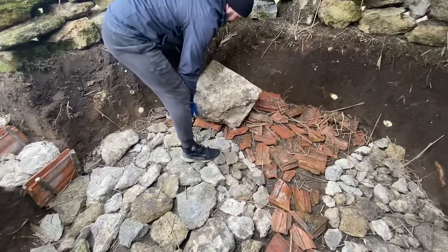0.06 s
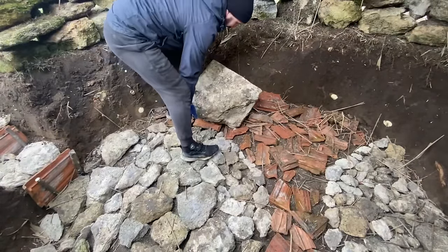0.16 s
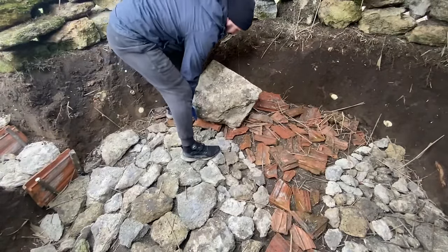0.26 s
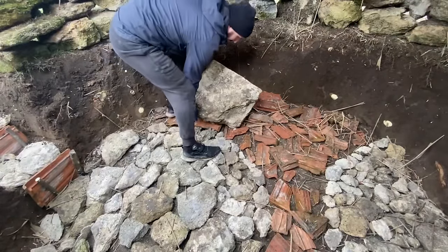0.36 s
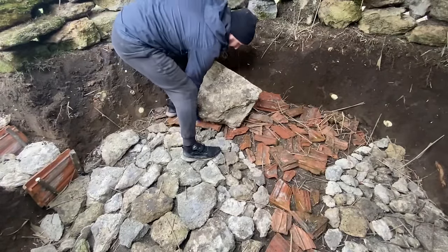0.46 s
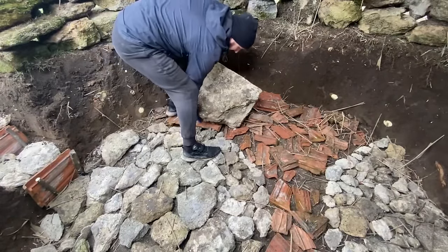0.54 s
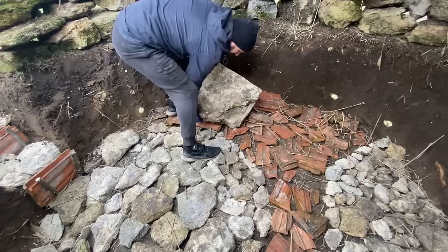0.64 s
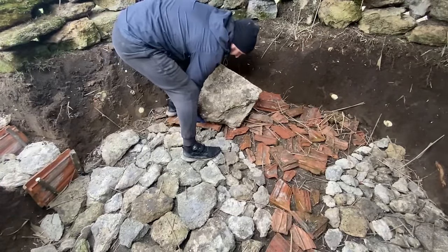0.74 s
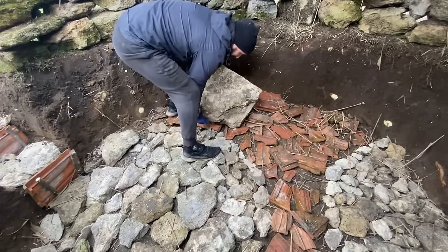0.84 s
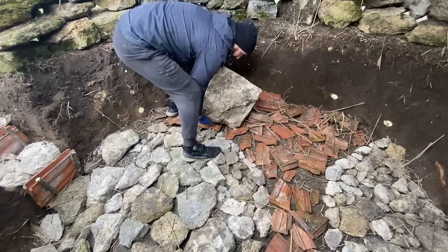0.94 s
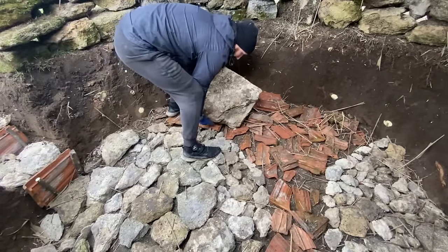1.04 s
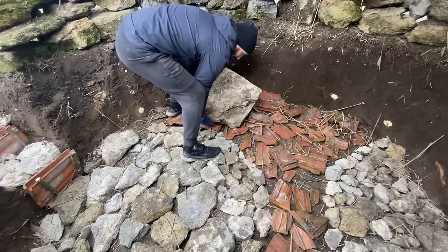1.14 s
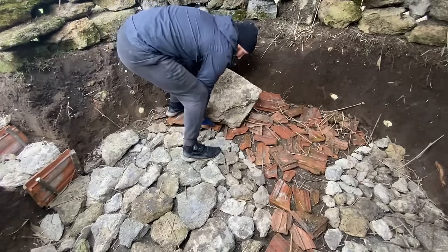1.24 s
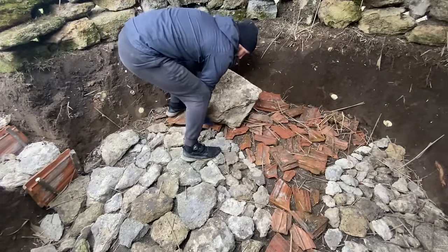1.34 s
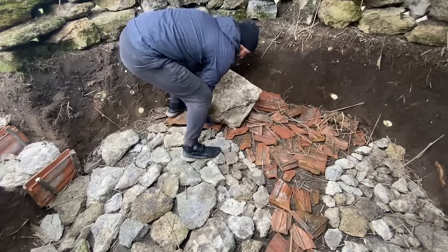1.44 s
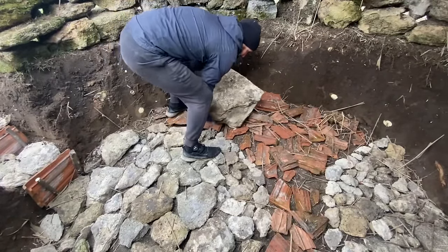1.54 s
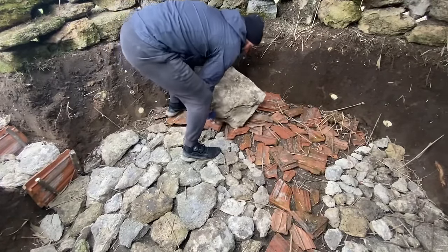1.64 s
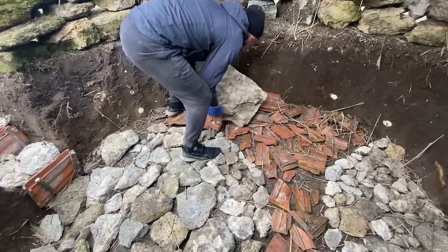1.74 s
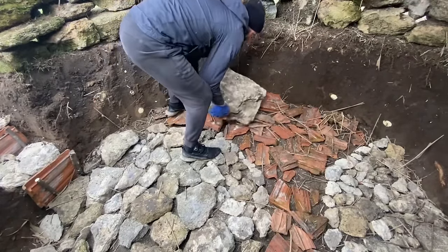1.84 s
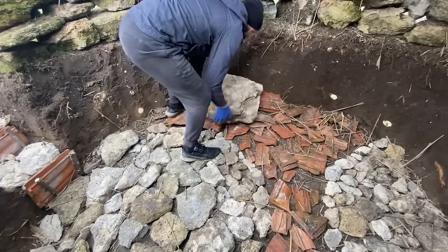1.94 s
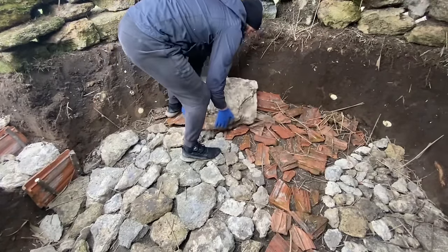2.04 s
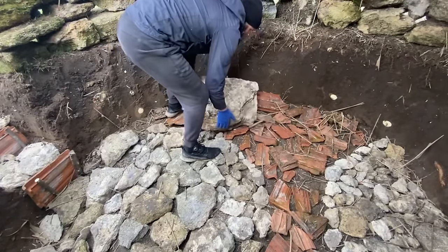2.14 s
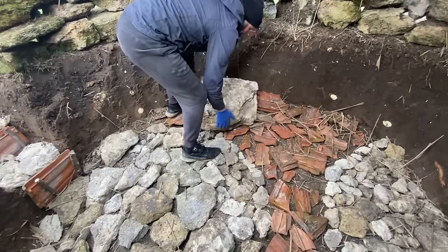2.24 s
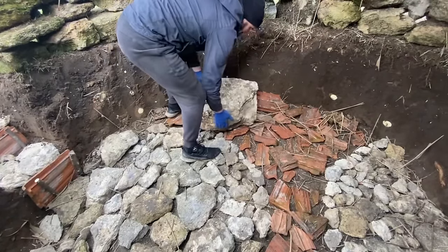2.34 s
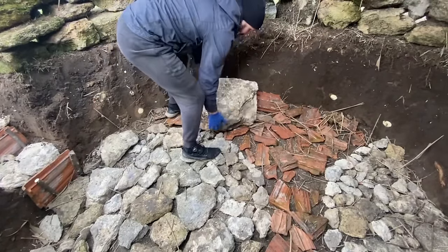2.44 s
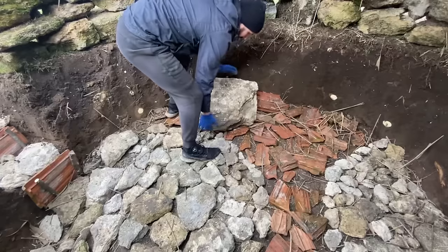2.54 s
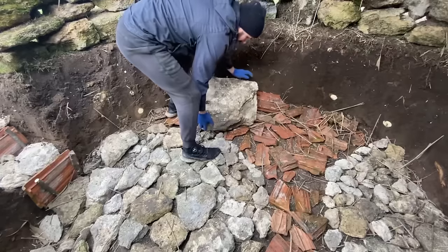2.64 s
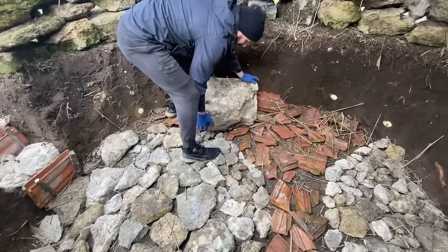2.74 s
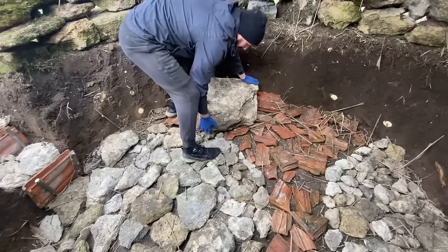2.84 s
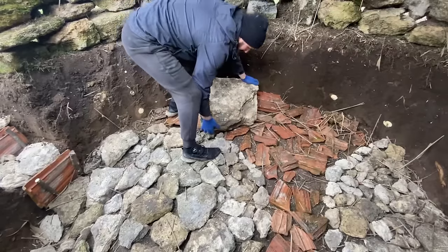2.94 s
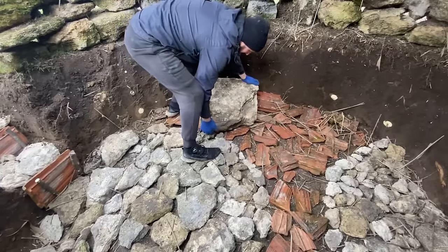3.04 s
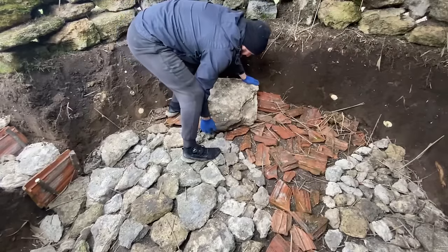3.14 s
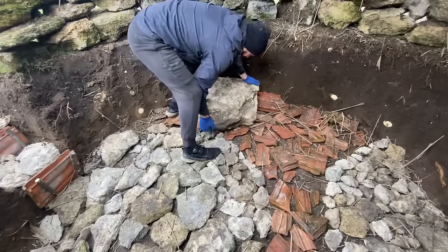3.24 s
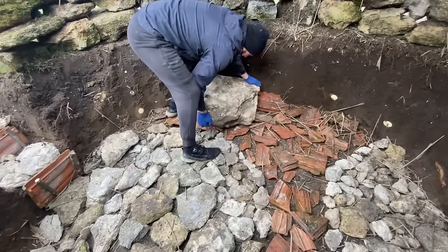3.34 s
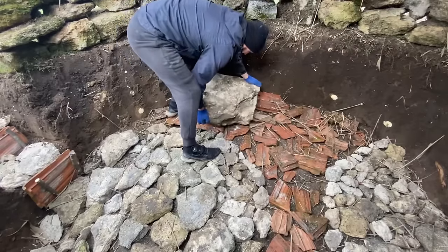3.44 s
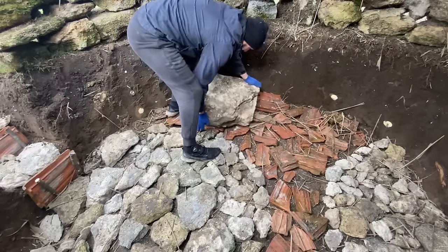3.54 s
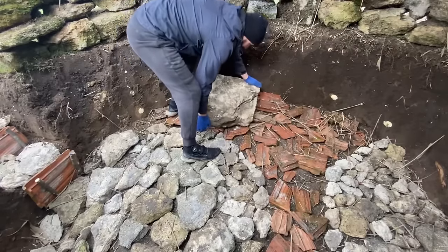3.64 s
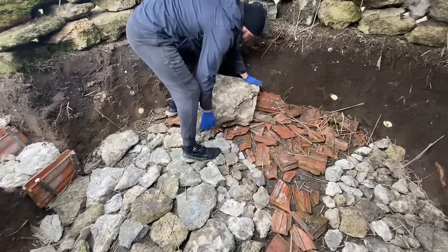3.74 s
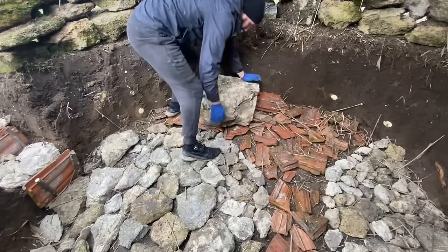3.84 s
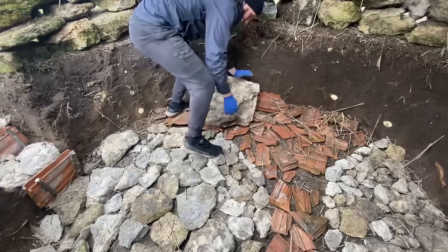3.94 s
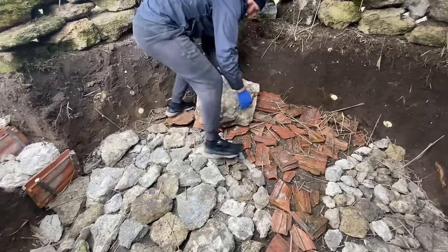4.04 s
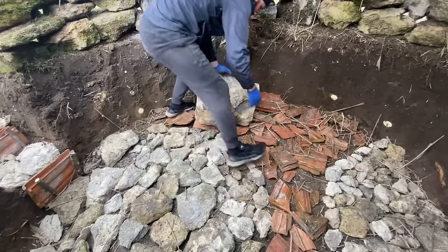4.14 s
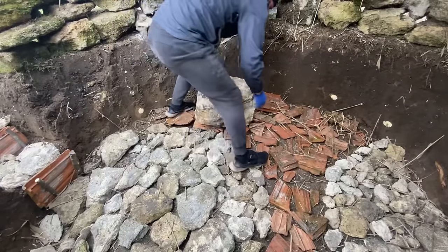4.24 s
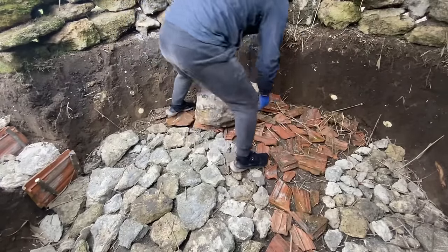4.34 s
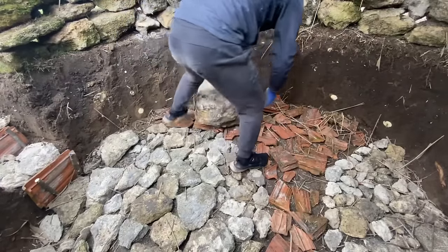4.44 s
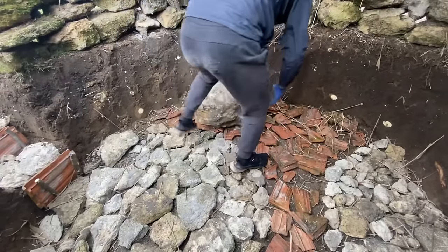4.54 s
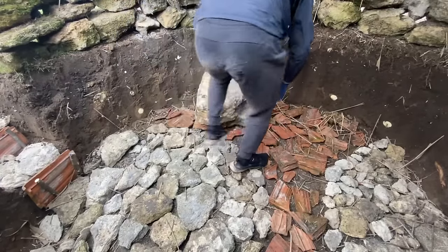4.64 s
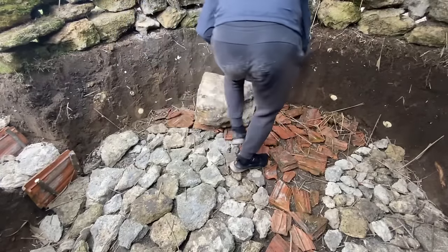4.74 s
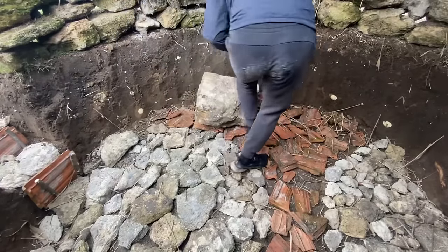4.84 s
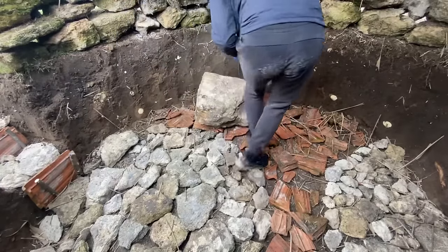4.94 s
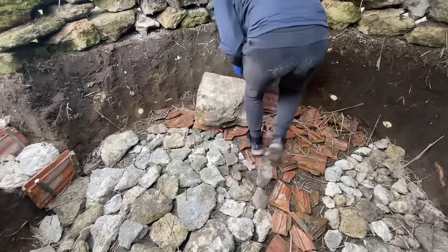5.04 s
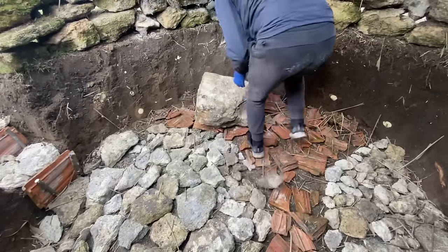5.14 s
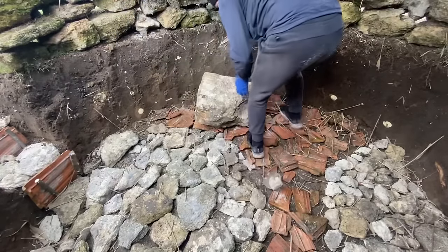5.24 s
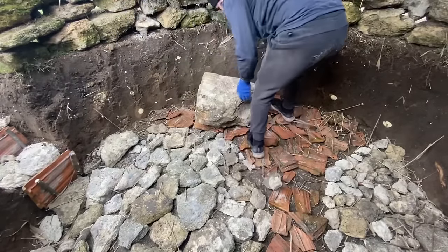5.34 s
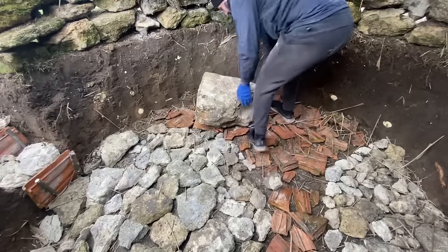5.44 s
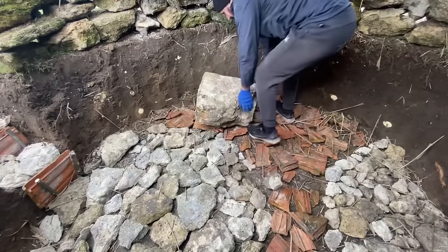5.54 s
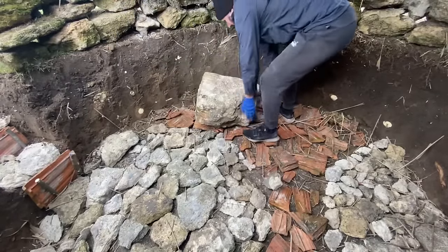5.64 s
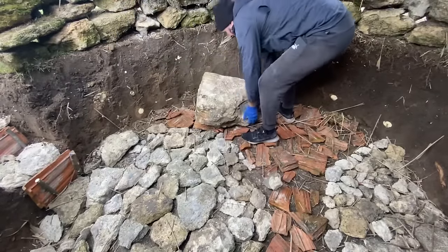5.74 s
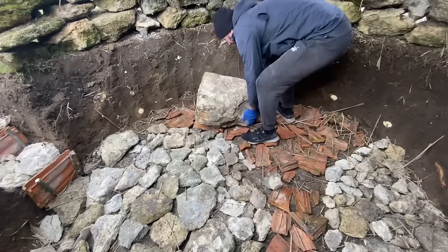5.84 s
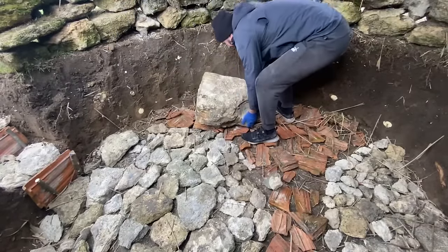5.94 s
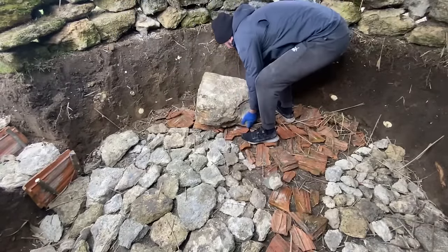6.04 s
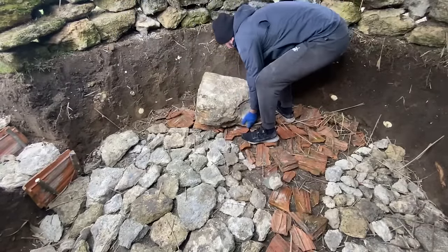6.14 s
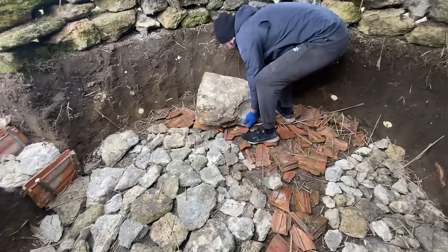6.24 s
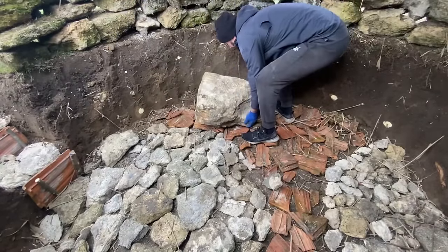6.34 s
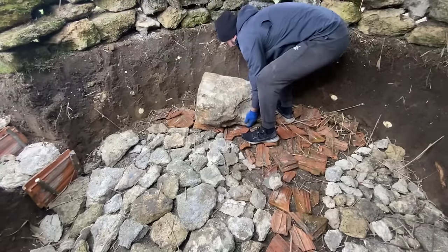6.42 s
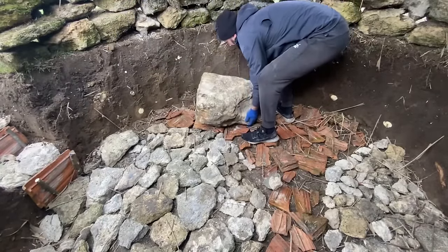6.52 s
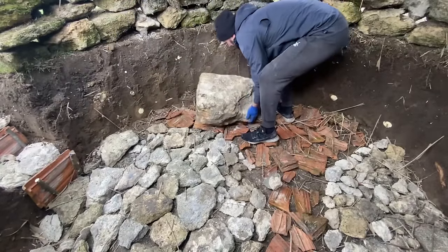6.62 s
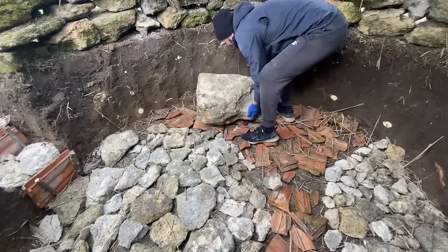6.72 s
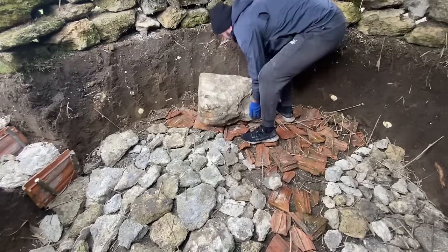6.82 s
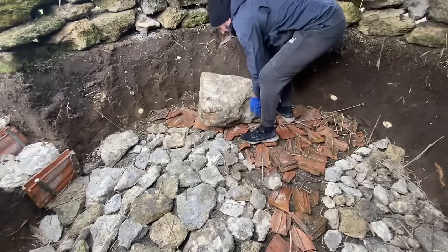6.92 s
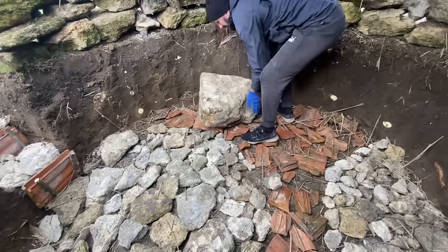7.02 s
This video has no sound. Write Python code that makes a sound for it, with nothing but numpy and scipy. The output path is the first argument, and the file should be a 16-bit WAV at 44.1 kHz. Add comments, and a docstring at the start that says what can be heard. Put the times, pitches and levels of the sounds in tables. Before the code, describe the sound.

In an earth pit outdoors, a boulder is nudged almost silently, then drags jerkily over broken clay tiles and drops with a loud, dry clunk and soil thud. Softer knocks follow as it is rocked. Shoes crunch on grit, a loose stone clinks twice, and a final double knock settles the boulder. A phone a few metres away catches faint steady rumble.

```python
"""In an earth pit outdoors, a boulder is dragged, dropped and rocked into place on broken clay tiles.
Knocks are bursts of tiny contacts that ring hollows, slabs and shards; drops also thud in the soil.
Sliding is jerky stick-slip that rings the tiles; grit is a crowd of short noise bursts under boulder and shoes.
A loose stone, kicked away, clinks twice as fading sine waves. A phone a few metres off also hears
a faint steady rumble of filtered noise."""
import sys
import numpy as np
from scipy import signal
from scipy.fft import rfft, irfft
from scipy.io import wavfile

SR = 44100
rng = np.random.default_rng(int(sys.argv[2]) if len(sys.argv) > 2 else 0)


def log_audio(samples):
    """Write samples as a 16-bit WAV file to the path given in sys.argv[1]."""
    # one column per channel
    frames = np.atleast_2d(samples).T
    # limit to full scale, then quantise
    limited = np.clip(frames, -1, 1)
    pcm = np.round(limited * 32767).astype(np.int16)
    wavfile.write(sys.argv[1], SR, pcm)


N = 312228
TIME = np.arange(N) / SR  # clock of the whole scene, s
RING = np.arange(int(.2 * SR)) / SR  # clock of one short sound, s

# Blows on the tile bed: t/s, slab level/dB, weight (hollows relative to slabs)/dB,
# hardness (shards relative to slabs)/dB, rattle time/s
KNOCKS = [(0.269, -60.5, 19, -2, 0.012), (1.486, -38.5, 5.5, -5.5, 0.015),
          (1.525, -32.5, -13, -10.5, 0.022), (1.596, -40, -8, -7, 0.0024), (1.619, -47, 8.5, 11.5, 0.017),
          (1.652, -28, -3.5, -16, 0.022), (1.771, -30.5, -4.5, -2, 0.0086), (1.826, -27.5, -14, -3, 0.003),
          (1.874, -20.5, -7.5, -8.5, 0.0058), (2.016, -21.5, -27, 3, 0.0081),
          (2.0205, -15.5, -21, -11, 0.0034), (2.026, -9.5, -5, -3.5, 0.003), (2.072, -40, -7, 1, 0.0027),
          (2.115, -32.5, -5.5, -2, 0.0097), (2.042, -27.5, -7.5, -3, 0.0085),
          (2.235, -41.5, -5.5, -3, 0.056), (3.286, -40.5, -6, -11, 0.0079), (3.402, -37, -5.5, -11, 0.01),
          (3.443, -32.5, -3.5, -4.5, 0.026), (3.511, -24.5, -2, -2, 0.011),
          (3.519, -21.5, -6, -7.5, 0.0028), (4.185, -43, -9, -4.5, 0.0043), (4.22, -41, 0.5, 6, 0.046),
          (4.2559, -32.5, 2.5, 2, 0.0024), (4.4, -28, -1, 0, 0.0044), (4.455, -38, -12, -0.5, 0.011),
          (4.906, -44, -1.5, -1.5, 0.0091), (5.009, -42.5, -1, 6, 0.017), (5.393, -33.5, -7.5, -16, 0.0019),
          (5.407, -35.5, -2, 5, 0.0036), (5.427, -42, -7, 3, 0.0019), (5.509, -47, 6, -4, 0.0064),
          (5.666, -39.5, 4, -6, 0.017), (5.747, -39.5, 1.5, -9.5, 0.003), (6.775, -27.5, 7.5, -5.5, 0.0077),
          (6.79, -19, -5, -7.5, 0.002), (6.894, -35, -15.5, -2, 0.0035), (6.946, -36, -6.5, -3, 0.023)]
# Weight landing on the soil: t/s, level/dB
THUDS = [(2.025, -21.5), (3.519, -37), (5.406, -35.5), (6.922, -37.5)]
# Ringing modes of the soil, the hollows under the tiles, the slabs and the shards:
# f/Hz, level/dB, time to fade by 60 dB/s
SOIL_MODES = [(56.7, -4, 0.13), (86.5, 1, 0.088), (137, -6, 0.11)]
HOLLOW_MODES = [(215, -14, .035), (262, -4, .045), (286, 0, .055)]
SLAB_MODES = [(440, 0, .045), (512, 2, .052), (590, -3, .035), (675, -2, .04), (748, -1, .04),
              (860, -6, .03), (1000, -5, .035)]
SHARD_MODES = [(1145, 3.5, 0.027), (1323, 4.5, 0.016), (1574, 1.5, 0.035), (1760, -11.5, 0.055),
               (2236, 0, 0.023), (2393, -12, 0.13), (3017, -6, 0.035), (3276, -9, 0.067), (4880, -14, .05)]
# Spectrum of cracking tile, also used for scuffs: f/Hz, level per Hz/dB
CRACK_COLOUR = [(200, -25), (1000, 11.5), (3000, -1), (4200, 4), (8000, -4), (11500, -4), (13300, -23.5)]


def knocks():
    """Each blow is a first contact and a dying rattle of smaller ones, which ring hollows, slabs and shards."""
    rattle_per_s, rattle_spread_db, first_contact = 900, 5.1, 3.7
    crack_stretch, swell = 0.96, 0.081  # crushing fade and build-up, as shares of the rattle time
    crush_force_db = -14
    # hardness rings the shards and raises the cracking level faster still
    crack_db_at_zero, crack_per_hardness = -9, 2.08
    shard_tilt_db, tilt_per_hardness = -2.0, 0.5  # tilt in dB per octave
    out = np.zeros((2, N))
    two_shards = np.tile(SHARD_MODES, (2, 1))  # each blow lands on two shards
    for s, slab_db, weight_db, hardness_db, rattle_s in KNOCKS:
        hollow_db = slab_db + weight_db
        shard_db = slab_db + hardness_db
        crack_db = slab_db + crack_db_at_zero + crack_per_hardness * hardness_db

        build_up = 1 - np.exp(-RING / (swell * rattle_s))
        crush = hiss(len(RING)) * build_up * np.exp(-RING / (crack_stretch * rattle_s))
        rattle = clicks(rattle_per_s, rattle_spread_db, len(RING)) * build_up
        rattle = rattle * np.exp(-(RING / rattle_s) ** 2.3)
        # the bed is crushed as well as struck, which roughens every ring
        force = rattle + undb(crush_force_db) * crush[1]
        force[0] += first_contact

        # a lightly loaded bed is slacker, so its hollows sound lower
        slack = .84 if max(slab_db, hollow_db) < -25 else 1
        # a hard contact brings out the high modes of the shards
        tilt_db = shard_tilt_db + tilt_per_hardness * hardness_db
        hollow = ring(HOLLOW_MODES, pitch=slack, detune=0.025, rise_cycles=2.2)
        slab = ring(SLAB_MODES, detune=0.038, tilt_db=3.0, right_db=-1.3)
        shard = ring(two_shards, detune=0.05, tilt_db=tilt_db, right_db=1.5)
        add(out, s, through(force, hollow), hollow_db)
        add(out, s, through(force, slab), slab_db)
        add(out, s, through(force, shard), shard_db)
        add(out, s, colour(crush, CRACK_COLOUR), crack_db)
    for s, db in THUDS:
        add(out, s, ring(SOIL_MODES), db)
    return out


# The loose stone bouncing: t/s, level/dB, upper modes level/dB, ring length as a share of the full one
CLINKS = [(5.0402, -16.5, -27, 0.34), (5.0448, -21.5, -36, 0.58), (5.1878, -14.5, -21.5, 1),
          (5.217, -49, -31, 0.49)]
# Single shards ringing freely, and the loose stone's first light touch at 5.18 s: t/s, f/Hz, level/dB, time to
# fade by 60 dB/s
PINGS = [(1.637, 2483, -31.5, 0.034), (1.662, 627, -32.5, 0.055), (1.775, 968, -29, 0.11),
         (1.829, 1019, -30.5, 0.21), (2.017, 2587, -19, 0.043), (2.027, 489, -17.5, 0.037),
         (2.225, 498, -40, 0.028), (3.514, 742, -23, 0.048), (3.515, 1053, -31.5, 0.034),
         (3.602, 1268, -49, 0.092), (3.859, 2600, -49.5, .035), (4.246, 2530, -46, 0.031),
         (4.257, 3705, -33, 0.022), (4.383, 813, -34, 0.14), (5.182, 2440, -25.5, 0.0059),
         (5.183, 5300, -28, 0.019), (5.369, 1232, -36, 0.055), (5.406, 2806, -27.5, 0.024),
         (5.409, 1730, -29, 0.061), (5.427, 3240, -35.5, 0.04), (5.511, 1275, -48, 0.09),
         (6.062, 1730, -46, 0.089), (6.065, 2417, -49, 0.14), (6.185, 2400, -58, 0.091),
         (6.27, 2416, -57, .1), (6.79, 1790, -28, 0.02), (6.791, 428, -23.5, 0.047),
         (6.897, 1295, -34, 0.077)]
# Main and upper ringing modes of the loose stone: f/Hz, level/dB, time to fade by 60 dB/s
STONE_MODES = [(1030, -8, .028), (1150, -7, .042), (1328, 0, .066), (1365, -14, .035)]
STONE_UPPER_MODES = [(1700, 7, 0.02), (2100, -7, 0.041), (2670, -4, 0.017), (2944, 4.5, 0.068),
                     (3137, -1.5, 0.053), (3490, -5, 0.03), (4700, -15, 0.032), (5500, -16.5, 0.027)]


def clinks():
    """The loose stone keeps its pitch; rough corners scuff and chatter its upper modes; single shards ping."""
    chatter_s, scuff_s = 0.0049, 0.0087
    stone_chatter, ping_chatter = 0.41, .06
    scuff_db = -10  # relative to the upper modes or the ping
    out = np.zeros((2, N))

    def contact(roughness):
        """A touch and the brief chatter after it."""
        chatter = rng.standard_normal(len(RING)) * np.exp(-RING / chatter_s)
        return (RING == 0) + roughness * chatter

    def scuff():
        """Rough faces brushing past each other make a short burst of noise."""
        return colour(hiss(len(RING)) * np.exp(-RING / scuff_s), CRACK_COLOUR)

    for s, db, upper_db, length in CLINKS:
        # lying against other stones shortens the ring
        damped_modes = np.array(STONE_MODES) * [1, 1, length]
        upper = ring(STONE_UPPER_MODES, right_db=3.5)
        add(out, s, ring(damped_modes, right_db=13.0, rise_cycles=4.6), db)
        add(out, s, through(contact(stone_chatter), upper), upper_db)
        add(out, s, scuff(), upper_db + scuff_db)
    for s, hz, db, t60 in PINGS:
        shard = ring([(hz, 0, t60)], right_db=1.5, rise_cycles=4.4)
        add(out, s, through(contact(ping_chatter), shard), db)
        add(out, s, scuff(), db + scuff_db)
    return out


# The boulder is shoved along: t/s, length/s, speed level/dB
SHOVES = [(0.35, 0.024, -51.5), (0.418, 0.015, -52), (1.434, 0.036, -48.5), (1.465, 0.099, -43.5),
          (1.615, 0.27, -30.5), (1.996, 0.02, -30.5), (3.298, 0.3, -49.5), (6.493, 0.084, -43.5),
          (6.623, 0.057, -40.5), (6.883, 0.032, -35.5)]


def boulder_speed():
    """Each shove gets the boulder going, keeps it sliding and lets it stop."""
    attack_s, release_s = 0.027, 0.052
    shoves = [undb(db) * push(s, length, attack_s, release_s) for s, length, db in SHOVES]
    return np.max(shoves, axis=0)


# Modes of the tiles that the boulder scrapes over: f/Hz, level/dB, time to fade by 60 dB/s
DRAG_MODES = [(257, -12, 0.061), (800, -1.5, 0.013), (1053, -1.5, 0.023), (1262, -6, 0.03),
              (1571, -0.5, 0.017), (1790, -7.5, 0.02), (2326, -8, 0.022), (2560, -6.5, 0.018)]
# The gap under the boulder changes note as it slides onto other tiles: from t/s, f/Hz, level/dB
GAPS = [(0, 540, -7.5), (1.4, 716, 0), (1.63, 622, 5.5), (1.76, 696, 1.5), (2.4, 651, 0), (4.5, 725, 2)]


def grinding(sliding):
    """The stone sticks and slips in jerks, which ring the tiles and the gap beneath it."""
    slips_per_s, slip_spread_db, jerk_db = 450, 2.8, 3
    catch_s, catch_db, gap_t60 = .025, -9, 0.035
    # the stone catches on an edge for a moment before each knock
    caught = np.max([(TIME > s - catch_s) & (TIME < s) for s, *_ in KNOCKS], axis=0)
    speed = sliding * undb(catch_db * caught + jerk_db * walk(60))
    slips = unit(clicks(slips_per_s, slip_spread_db, N)) * speed
    place = np.searchsorted([s for s, *_ in GAPS[1:]], TIME)  # which gap is under the boulder
    out = 0
    for k, (s, hz, db) in enumerate(GAPS):
        body = ring([(hz, db, gap_t60)] + DRAG_MODES, detune=0.029, right_db=3.0)
        body = body / np.sqrt(np.sum(body ** 2) / 2)
        out = out + through(slips * (place == k), body)
    return out


# A shoe or the boulder's edge bears down on grit and eases off: peak t/s, level/dB, build-up/s, release/s
CRUNCHES = [(.52, -60, 0.34, 0.75), (1.628, -29, 0.0089, 0.056), (2.58, -51.5, 0.12, 0.11),
            (3.27, -45, 0.16, 0.16), (4.235, -51.5, 0.05, 0.054), (4.392, -42, 0.057, 0.045),
            (4.955, -44, 0.085, 0.13), (5.127, -43, 0.027, 0.11), (5.347, -37.5, 0.0052, 0.11),
            (5.404, -25, 0.02, 0.018), (5.55, -55, 0.068, 0.37), (6.035, -44.5, 0.026, 0.033),
            (6.65, -52.5, 0.23, 0.043), (6.9, -42.5, 0.1, 0.042)]


def pressure():
    """The load on the grit builds and eases with each crunch."""
    crunches = [undb(db) * push(s, 0, build_s, release_s) for s, db, build_s, release_s in CRUNCHES]
    return np.max(crunches, axis=0)


# Single grains of grit snapping: t/s, level/dB
SNAPS = [(0.1217, -58.5), (0.443, -42), (1.729, -30.5), (2.0258, -23.5), (2.661, -50), (4.14, -54.5),
         (4.829, -52), (4.97, -42.5), (5.108, -42.5), (5.339, -42.5), (5.395, -26), (5.955, -51.5)]
# Spectra of the crushed grit and of a snapping grain: f/Hz, level per Hz/dB
GRIT_COLOUR = [(200, -28), (1000, -1), (2500, -3.5), (5300, -4), (7000, -4.5), (9000, -9.5), (11000, -2),
               (12300, -6), (13500, -21.5)]
SNAP_COLOUR = [(500, -9), (8500, -8.5), (11500, -1.5), (14000, -20.5)]


def grit(crushing):
    """Dense tiny fractures are each a short burst of noise; now and then a single grain snaps."""
    grains_per_s, spread_db, flicker_db = 1800, 4, 0.5
    grain_s, snap_s = .0018, .003
    force = unit(clicks(grains_per_s, spread_db, N)) * undb(flicker_db * walk(70))
    # overlapping bursts add up in energy
    energy = through(force ** 2, np.exp(-2 * RING / grain_s)[None])
    burst = np.maximum(energy, 0) ** .5
    out = unit(colour(burst * hiss(N), GRIT_COLOUR)) * crushing
    for s, db in SNAPS:
        snap = hiss(len(RING)) * np.exp(-RING / snap_s)
        add(out, s, colour(snap, SNAP_COLOUR), db)
    return out


def pit(x):
    """Earth walls and stones soon scatter the sound; the garden beyond returns a faint tail, mostly treble."""
    near_db, near_t60, near_from_s = -11, 0.083, .004
    far_db, far_t60, far_from_s = -32, 0.22, .03
    fade = undb(-60 * RING / np.array([near_t60, far_t60])[:, None, None])
    near, far = rng.standard_normal((2, 2, len(RING))) * fade
    near = near * (RING > near_from_s)
    far = colour(far * (RING > far_from_s), [(1500, -24.0), (12000, -2.5)])
    response = undb(near_db) * unit(near) + undb(far_db) * unit(far)
    return x + through(x, response / np.sqrt(len(RING)))


# Spectrum of the outdoor background: f/Hz, level per Hz/dB
OUTDOORS_COLOUR = [(20, -16.5), (55, -1.5), (140, 0), (260, -7.5), (500, -16), (1000, -25), (6000, -36),
                   (11500, -31), (14000, -48)]


def outdoors():
    """Steady distant rumble, much alike on both sides, under a thin diffuse hiss: all filtered noise."""
    level_db = -51
    mid, side = rng.standard_normal((2, N))
    # left and right differ most in the treble
    side = colour(side, [(25, -3), (70, -11), (140, -16), (400, -6), (1000, 0)])
    both = mid + side * np.array([[1], [-1]])
    return unit(colour(both, OUTDOORS_COLOUR)) * undb(level_db)


def ring(modes, pitch=1, detune=0., tilt_db=0., right_db=0., rise_cycles=1.0, wide_hz=380):
    """Left and right ring of a body as fading sines; where it is touched shifts and weights its modes."""
    scatter_db = 1.6
    hz, db, t60 = np.transpose(modes)[:, :, None]
    shift, size, pan = rng.standard_normal((3, len(modes), 1))
    ports = np.array([-1, 1])[:, None, None] / 2  # left, right
    side = (-1) ** np.arange(len(modes))[:, None]
    # high modes reach the two ports out of step
    phase = 2 * np.pi * hz * pitch * (1 + detune * shift) * RING + 2 * ports * side * hz / (hz + wide_hz)
    db = db + tilt_db * np.log2(hz / hz[0])
    db = db + scatter_db * (size + ports * pan) + ports * right_db
    rise = 1 - np.exp(-RING * hz / rise_cycles)
    return np.sum(rise * undb(db - 60 * RING / t60) * np.sin(phase), axis=1)


def clicks(per_s, spread_db, size):
    """Random micro-contacts: many small, a few large."""
    hit = rng.random(size) < per_s / SR
    strength = undb(spread_db * np.minimum(rng.exponential(size=size), 4))
    return hit * rng.choice([-1, 1], size) * strength


def hiss(size, apart=1.0):
    """Noise at two ports: the left hears the common part a moment later, and each has a share of its own."""
    common, left, right = rng.standard_normal((3, size))
    late = np.roll(common, 4)  # in samples
    return np.array([late + apart * left, common + apart * right])


def walk(rate):
    """Slow random wavering around 0, through `rate` random points per second."""
    knots = rng.standard_normal(N // 100)
    return np.interp(TIME * rate, np.arange(len(knots)), knots)


def push(s, hold_s, attack_s, release_s):
    """Envelope that builds up to time s, holds and dies away."""
    before = np.minimum(TIME - s, 0)
    after = np.maximum(TIME - s - hold_s, 0)
    return np.exp(before / attack_s - after / release_s)


def colour(x, points):
    """Filter that gives noise a spectrum of (f/Hz, level/dB) points without sounding ahead of its input."""
    hz, db = np.transpose(points)
    size = 2048
    log_hz = np.log(np.fft.rfftfreq(size, 1 / SR) + 1)
    log_gain = np.log(undb(np.interp(log_hz, np.log(hz), db)))
    # folding the cepstrum forward in time gives the minimum-phase filter
    cepstrum = irfft(log_gain) * np.r_[1, np.full(size // 2 - 1, 2), np.zeros(size // 2)]
    return through(x, irfft(np.exp(rfft(cepstrum)))[None])


def through(x, response):
    """Let a sound excite a response (convolution), keeping the length."""
    return signal.fftconvolve(np.atleast_2d(x), response, axes=1)[:, :np.shape(x)[-1]]


def add(out, s, sound, db):
    """Mix in a short sound at time s; db is its energy as an rms over one blow length."""
    blow_s = .02
    start = int(s * SR)
    sound = sound * undb(db) / np.sqrt(np.sum(sound ** 2) / (2 * blow_s * SR))
    out[:, start:start + sound.shape[1]] += sound[:, :N - start]


def undb(db):
    """Decibels to gain."""
    return 10 ** (np.asarray(db) / 20)


def unit(x):
    """Scale to rms 1."""
    return x / np.sqrt(np.mean(x ** 2))


def scene():
    """All the stone work in the pit, over the outdoors; sliding crushes grit, and crushing slides the tiles."""
    crunch_slide_db = -6.5
    shove_grit_db, grit_per_speed = -22.5, 0.67  # second: dB of grit gained per dB of speed
    speed, load = boulder_speed(), pressure()
    sliding = np.hypot(speed, undb(crunch_slide_db) * load)
    crushing = np.hypot(load, undb(shove_grit_db) * speed ** grit_per_speed)
    stone_work = knocks() + clinks() + grinding(sliding) + grit(crushing)
    return pit(stone_work) + outdoors()


def record(dry):
    """The phone rounds off loud peaks and cuts the top of the treble."""
    top_hz = 15800
    rounded = np.tanh(dry)
    return signal.sosfilt(signal.ellip(8, .2, 70, top_hz, fs=SR, output="sos"), rounded)


dry = scene()
out = record(dry)
log_audio(out)
```